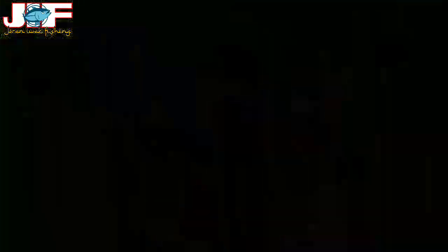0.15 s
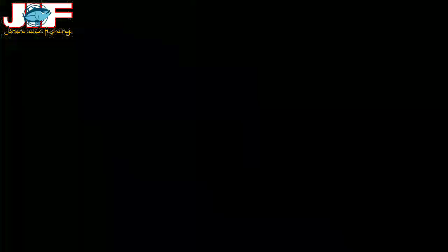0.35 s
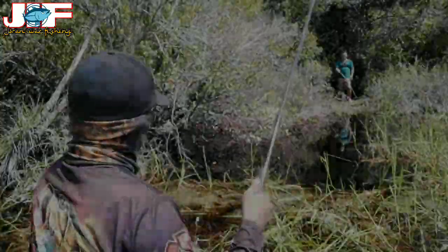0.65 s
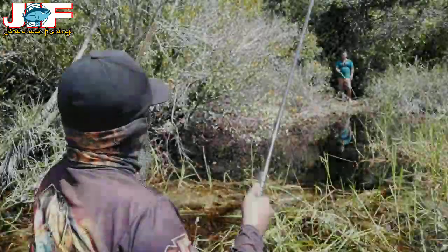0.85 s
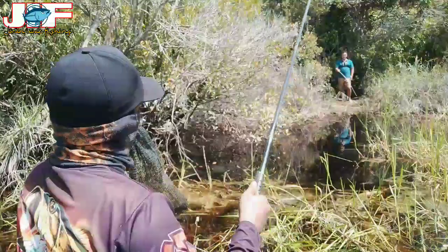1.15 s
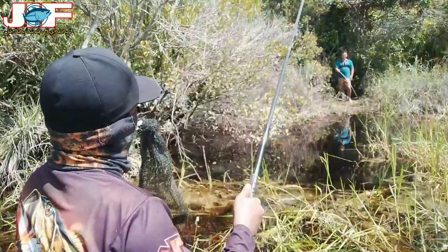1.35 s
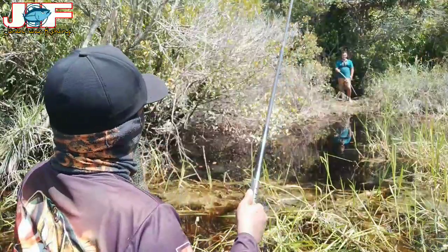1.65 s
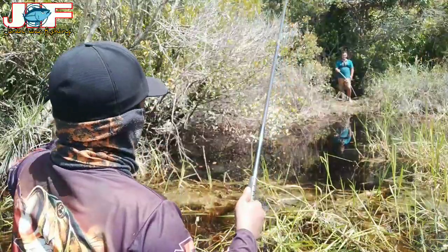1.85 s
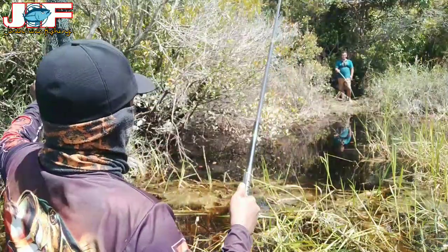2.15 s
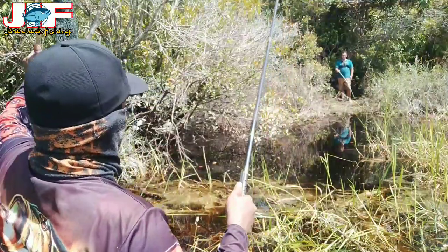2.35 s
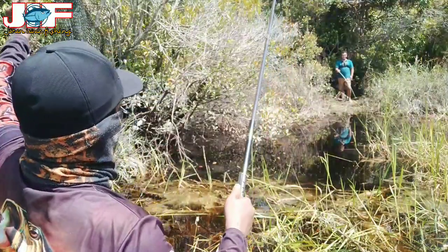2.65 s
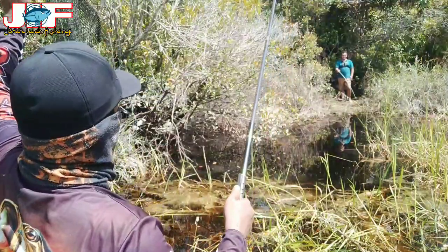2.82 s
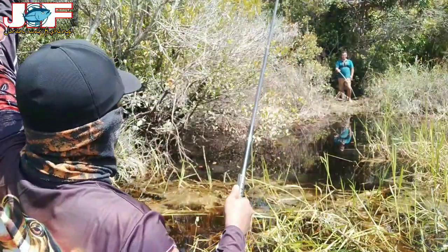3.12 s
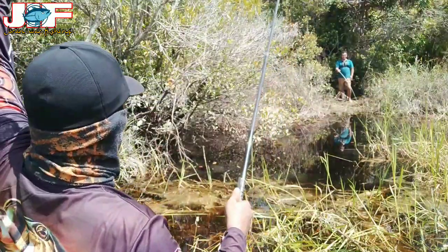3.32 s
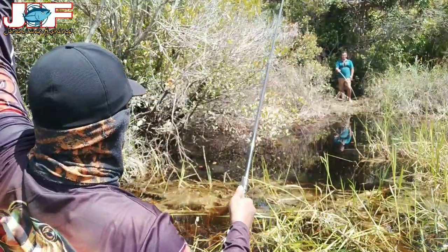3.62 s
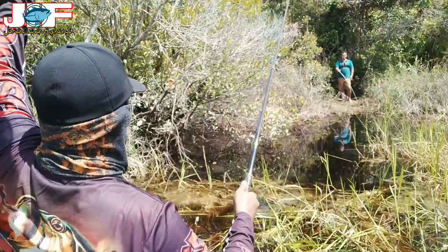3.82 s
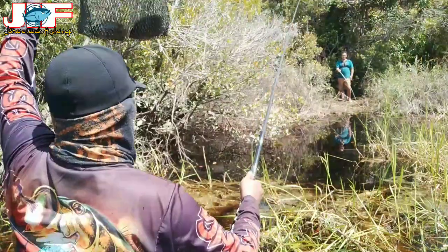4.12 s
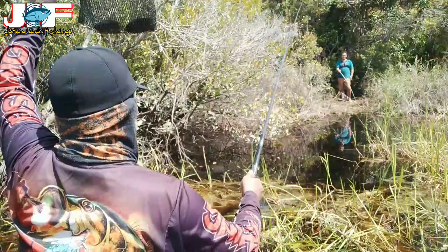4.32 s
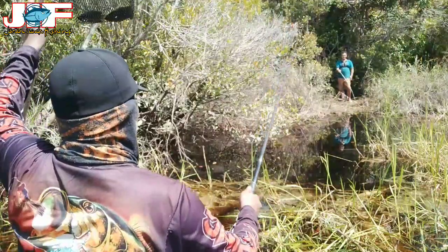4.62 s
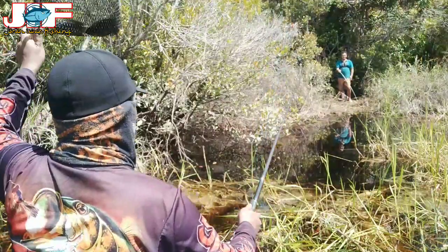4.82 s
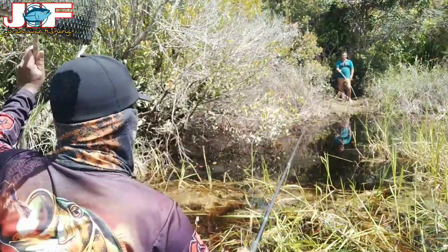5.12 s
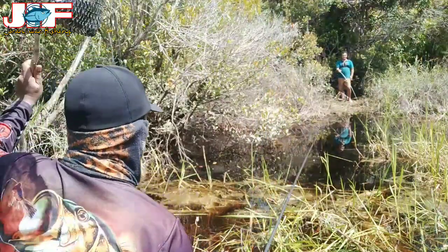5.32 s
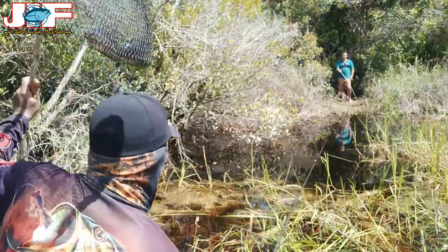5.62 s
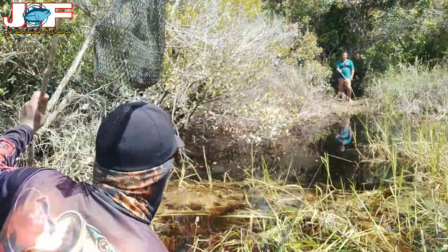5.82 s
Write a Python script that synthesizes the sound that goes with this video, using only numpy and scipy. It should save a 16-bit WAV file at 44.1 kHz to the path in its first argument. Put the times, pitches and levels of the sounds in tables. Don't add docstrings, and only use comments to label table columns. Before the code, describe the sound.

A brief burst of dripping, rustling net fades into silence, then an open swamp fades up. One bird repeats four quick chips while a hoarser one alternates falling and rising phrases. A wooden knock rings through the trees near two seconds; a trilling insect swells and stops abruptly at four and a half over throbbing katydids. Wind puffs hit the left side of the stereo microphone, and twigs snap close by at the end.

```python
import sys
import numpy as np
from scipy import signal
from scipy.fft import rfft, irfft
from scipy.io import wavfile

SR = 44100
rng = np.random.default_rng(int(sys.argv[2]) if len(sys.argv) > 2 else 0)


def level_to_linear(level):
    exponent = np.asarray(level, float) / 20
    return 10 ** exponent


def to_wav(sig):
    pcm = np.clip(np.atleast_2d(sig), -1, 1) * 32767
    pcm = np.round(pcm).astype(np.int16)
    wavfile.write(sys.argv[1], SR, pcm.T)


N = 263277


def rms_one(x):
    return x / np.sqrt(np.mean(x ** 2) + 1e-20)


def in_time(rows):
    s, *columns = np.transpose(rows)
    return [np.interp(np.arange(N) / SR, s, c) for c in columns]


def at_hz(points, hz):
    table_hz, value = np.transpose(points)
    return np.interp(np.log(hz), np.log(table_hz), value)


def drift(rate):
    r = np.exp(-80 * np.pi * rate / SR)
    slow = signal.lfilter([1], [1, -2 * r, r * r], rng.standard_normal(N // 40 + 2002))
    slow = slow[2000:]
    return np.interp(np.arange(N) / 40, np.arange(len(slow)), rms_one(slow))


def band(x, low_hz, high_hz):
    edges = [low_hz, min(high_hz, .46 * SR)]
    return signal.sosfilt(signal.butter(2, edges, "band", fs=SR, output="sos"), x)


def colour(x, points):
    hz = np.maximum(np.fft.rfftfreq(N, 1 / SR), 1)
    return irfft(rfft(x) * level_to_linear(at_hz(points, hz)), N)


def pan(x, db):
    return np.array([x * level_to_linear(db / 2), x * level_to_linear(-db / 2)])


def far_pan(x, db, late=12):
    left, right = pan(x, db)
    return np.array([left, np.roll(right, late)])


def add(out, s, x):
    i = round(s * SR)
    out[..., i:i + x.shape[-1]] += x[..., :max(N - i, 0)]


def note(rows):
    s, hz, db = np.transpose(rows)
    t = np.arange(s[0], s[-1], 1 / SR)
    phase = 2 * np.pi * np.cumsum(np.interp(t, s, hz)) / SR
    return level_to_linear(np.interp(t, s, db)) * np.sin(phase)


def swell(s, db, length):
    return level_to_linear(db - 20 * np.abs(np.arange(N) / SR - s) / length)


# (frequency [Hz], t60 [s])
TREE_T60 = [(150, 1.15), (500, 1.9), (1500, 1.14), (5000, 1.01), (12000, 0.11)]


def trees(x, length):
    t, edges = np.arange(SR) / SR, np.geomspace(100, 16000, 9)
    white = rng.standard_normal((2, SR))
    tail = 0
    for low_hz, high_hz in zip(edges, edges[1:]):
        t60 = length * at_hz(TREE_T60, low_hz)
        tail = tail + band(white, low_hz, high_hz) * level_to_linear(-60 * t / t60)
    return signal.fftconvolve(x[None], rms_one(tail) / np.sqrt(SR), axes=1)[:, :N]


# (frequency [Hz], level [dB per
# Hz])
FOREST_COLOUR = [(120, -10), (160, -4), (250, -4), (600, -8.5), (1500, -11), (3000, -11.5), (5000, -11.5),
                 (5900, -15.5), (7000, -9.5), (8500, -18), (9600, -21.5), (10300, -32), (15000, -22),
                 (15500, -74)]
# (frequency [Hz], correlation [-1..1])
EAR_LIKENESS = [(60, 0.78), (180, 0.38), (550, 0.19), (1650, -0.068), (4970, 0.07), (15000, 0.098)]
# (frequency [Hz], left minus right [dB])
FOREST_LEAN = [(60, 2), (130, -2), (290, -1), (640, -0.5), (1410, 0), (3100, -3), (6820, 0), (15000, 0.5)]


def forest(patchy_db):
    hz = np.maximum(np.fft.rfftfreq(N, 1 / SR), 1)
    alike = np.clip(at_hz(EAR_LIKENESS, hz), -1, 1)
    mid, side = rfft(rng.standard_normal((2, N)))
    both = pan(np.sqrt(1 + alike) * mid, 0) + np.sqrt(1 - alike) * side * [[1], [-1]]
    both = both * pan(level_to_linear(at_hz(FOREST_COLOUR, hz)), at_hz(FOREST_LEAN, hz)) * (hz > 110)
    out, places = 0, np.log2(hz / 100) * 2
    for k in range(0, 16, 2):
        share = np.clip(1 - np.abs(places - k) / 2, 0, 1)
        out = out + irfft(both * share, N) * level_to_linear(patchy_db * drift(19.0))
    return level_to_linear(-52.5) * rms_one(out)


# (time [s], level [dB])
BREEZE_LEVEL = [(0, -66), (.55, -54), (1.2, -56), (1.9, -53), (2.1, -64), (2.5, -70), (2.8, -60),
                (3.0, -65), (4.0, -60), (4.6, -60.5), (5.0, -56), (5.25, -63), (5.4, -56), (5.97, -58)]
# (time [s], level [dB], time to gain or lose 20 dB [s], left minus right [dB])
PORT_GUSTS = [(2.27, -54, 0.2, -4), (2.72, -50, 0.22, 10), (3.12, -48.5, 0.12, 17.5),
              (3.27, -50.5, 0.05, 15), (3.37, -54, 0.2, -12), (3.51, -51, 0.07, -10),
              (3.67, -49, 0.0734, 22.5), (3.9, -50, 0.04, 8), (4.21, -57, .3, 5), (4.34, -43, 0.12, 6),
              (4.42, -50, 0.0117, 15.5), (4.801, -57, 0.3, 8), (5.4, -47, 0.15, 3), (5.97, -54, 0.32, 4)]
# (time [s], level [dB])
PORT_PUFFS = [
    (3.089, -37),
    (3.29, -38.5),
    (3.569, -36.5),
    (3.794, -23.5),
    (4.405, -31.5),
    (5.345, -46),
]


def wind(gain):
    blowing = pan(level_to_linear(in_time(BREEZE_LEVEL)[0]), -1.5)
    for s, db, length, lean_db in PORT_GUSTS:
        blowing = blowing + pan(swell(s, db - 2.5, length), lean_db)
    noise = band(band(rng.standard_normal((2, N)), 40.0, 97.0), 40, 207)
    lumps = level_to_linear([6.3 * drift(9.6), 1.5 * drift(4.5)])
    out = rms_one(noise * lumps) * blowing * gain * level_to_linear(3.5)
    t = np.arange(0, .07, 1 / SR)
    push = np.exp(-t / 0.00726) * (1 - np.exp(-t / 0.00358))
    puff = np.sin(2 * np.pi * (115 * t - 500 * t ** 2)) * push
    for s, db in PORT_PUFFS:
        add(out, s - .004, pan(level_to_linear(db + 2.5) * puff, 25.2))
    return out


# (time [s], level [dB])
LOWER_CHORUS = [(0, -84), (.9, -58), (2.2, -76), (2.6, -97), (3.5, -69), (5.97, -67.5)]


def choruses():
    white = rng.standard_normal((3, N))
    wide = rms_one(band(band(white[0], 8570, 9760), 8130, 10130)) * level_to_linear(-66.5 + 1.14 * drift(6.1))
    lower = rms_one(band(white[1], 9130, 9330)) * level_to_linear(in_time(LOWER_CHORUS)[0] + 3.1 * drift(3.4))
    crickets = rms_one(band(white[2], 7610, 7933)) * level_to_linear(-71.5 + 1.0 * drift(12))
    return pan(wide + lower, 18.7) + pan(crickets, 20)


def stridulate(events, hz, width_hz, length, strokes):
    gate, t = np.zeros(N), np.arange(0, length, 1 / SR)
    for s, db in events:
        add(gate, s - .006, level_to_linear(db) * np.sin(np.pi * t / length) ** 0.46)
    clicks = (rng.random(N) < strokes / SR) * rng.normal(1, 0.88, N) * rng.choice([-1, 1], N)
    ring = band(clicks, hz - width_hz / 2, hz + width_hz / 2)
    return gate * rms_one(band(ring, hz - 2 * width_hz, hz + 2 * width_hz))


# (time [s], level [dB])
CRICKET_CHIRPS = [
    (1.85, -63),
    (2.3, -57),
    (4.36, -45.5),
    (4.53, -53),
    (4.8, -51),
    (5.045, -50),
    (5.23, -57),
    (5.43, -50),
]


def cricket():
    return pan(stridulate(CRICKET_CHIRPS, hz=7930, width_hz=320, length=0.026, strokes=430), 22) * level_to_linear(-7.5)


# (time [s], length [s], time between throbs [s], level [dB])
KATYDID_BOUTS = [
    (0.478, .88, 0.081, -49.5),
    (1.42, .65, 0.08, -55),
    (2.125, .07, 0.043, -49),
    (2.54, .5, 0.08, -67),
    (3.089, .96, .0712, -52.5),
    (4.074, .64, 0.0639, -48.5),
    (4.746, 1.2, .0733, -48),
]


def katydid(gain):
    throbs = []
    for start, length, period, db in KATYDID_BOUTS:
        for s in np.arange(start, min(start + length, N / SR), period):
            throbs.append((s, db + 20 * np.log10(gain[int(s * SR)] + 1e-6)))
    return pan(stridulate(throbs, hz=9510.0, width_hz=244, length=0.044, strokes=1100), 27.3) * level_to_linear(-16.5)


def blows(hits, modes, crack_top_hz):
    rings, cracks, t = np.zeros(N), np.zeros(N), np.arange(0, .2, 1 / SR)
    for s, db, bright_db in hits:
        ring = 0
        for (hz, level_db, t60), chance_db in zip(modes, rng.normal(0, 1.5, len(modes))):
            tilt_db = bright_db * np.log2(hz / 800)
            mode = np.sin(2 * np.pi * hz * t)
            ring = ring + level_to_linear(db - 5 + level_db + chance_db + tilt_db - 60 * t / t60) * mode
        add(rings, s, (1 - np.exp(-t / 0.00081)) * ring)
        snap = rng.standard_normal(len(t)) * level_to_linear(db - 8.0 - 60 * t / 0.067)
        snap[0] = 5.0 * level_to_linear(db)
        low = band(band(snap, 207, crack_top_hz), 192, 2540)
        middle = level_to_linear(2 * bright_db - 1.5) * band(band(snap, 1970, 3500), 750, 6400)
        high = level_to_linear(3.8 * bright_db - 4) * band(band(snap, 3950, 5400), 2330, 5700)
        add(cracks, s, low + middle + high)
    body = sum(level_to_linear(level_db) * band(cracks, hz - 55, hz + 55) for hz, level_db, t60 in modes)
    return rings, cracks, body


# (time [s], level [dB], brightness [dB per octave])
LOG_KNOCKS = [
    (2.052, -30.5, 2),
    (2.062, -18, 1),
    (2.077, -33, -2),
    (2.098, -32, 3.5),
    (2.116, -37, 0.5),
    (2.159, -40, -5),
]
# (frequency [Hz], level [dB], t60 [s])
LOG_MODES = [(237, -2.5, 0.03), (294, 1.5, 0.037), (400, -5, .025), (528, -6, 0.035), (783, -3, 0.04),
             (985, -4.5, 0.021), (1280, 1, 0.018), (1460, 2, 0.02), (1575, 2, 0.02), (2055, -2.5, 0.021),
             (2224, -1, 0.028), (2580, -10, .015), (2900, -7, 0.012)]
# (frequency [Hz], level [dB])
LOG_ECHO_COLOUR = [(150, -2), (400, 4), (800, -2), (1150, 0), (1700, -10), (2200, 3), (3700, -5), (4400, 4)]
# (time [s], level [dB], brightness [dB per octave])
STUMP_KNOCKS = [
    (4.475, -38, 1.5),
    (4.480, -28.5, -2),
    (4.490, -35, 0),
    (4.495, -28, -1.5),
    (4.505, -36, 1.5),
]
# (frequency [Hz], level [dB], t60 [s])
STUMP_MODES = [(216, -0.5, 0.027), (296, 4, .035), (358, -2.5, .03), (530, -4, .04), (779, -4, .035),
               (1064, 3, 0.033), (1290, -3, 0.025), (1850, -8.5, 0.022), (2080, -3, 0.023),
               (3030, -4, 0.017)]
# (frequency [Hz], level [dB])
STUMP_ECHO_COLOUR = [(150, -6), (300, 0), (550, 3), (850, -2), (1150, 2), (1700, -5), (2100, 1), (3000, 2)]


def knocks():
    direct, sent = 0, 0
    for hits, modes, crack_top_hz, echo_colour in (
            (LOG_KNOCKS, LOG_MODES, 1500, LOG_ECHO_COLOUR), (STUMP_KNOCKS, STUMP_MODES, 1150, STUMP_ECHO_COLOUR)):
        rings, cracks, body = blows(hits, modes, crack_top_hz)
        direct = direct + rings + level_to_linear(-3.0) * cracks
        sent = sent + colour(.9 * cracks + .8 * body + 0.035 * rings, echo_colour)
    tail, spread = trees(sent, length=0.42)
    returned = level_to_linear(10.2) * far_pan(tail, -1.9, late=4) + level_to_linear(-8) * spread * [[1], [-1]]
    return far_pan(direct, -0.76, late=4) + returned


# (time [s], level [dB], time to gain or lose 20 dB [s])
RUSTLES = [
    (.06, -47.5, 0.1266),
    (1.02, -63.5, 0.06),
    (1.3, -63.5, 0.08),
    (5.5, -50.5, 0.17),
    (5.42, -51, .06),
    (5.87, -53, 0.08),
    (5.97, -48, .08),
    (.6, -83, 1.5),
]


def rustle():
    grains = rng.random((2, N)) < 600 / SR
    grains = grains * level_to_linear(2.8 * np.minimum(rng.exponential(1, (2, N)), 4))
    grains = grains * rng.choice([-1, 1], (2, N))
    strength = sum(swell(*row) for row in RUSTLES)
    return strength * rms_one(band(grains + 0.25 * grains[::-1], 300, 5100))


# (time [s], level [dB])
BUZZ_LEVEL = [(0, -56), (.2, -68), (.33, -80), (.385, -92)]


def buzz():
    turn = 2 * np.pi * 122 * np.arange(N) / SR
    tone = np.sin(turn) + .5 * np.sin(2 * turn) + .2 * np.sin(3 * turn)
    return level_to_linear(in_time(BUZZ_LEVEL)[0] + 1.5) * tone


# (time [s], level [dB], pitch [Hz], t60 [s], pitch rise [share per s])
NET_DRIPS = [(.001, -28.5, 1510, 0.028, 5), (.017, -37, 2900, .015, 8), (.033, -35.5, 1004, .03, 6),
             (.037, -31.5, 2380, 0.022, 11), (.057, -36, 900, .025, 10), (.07, -35.5, 406, 0.052, 22),
             (.071, -36, 1450, .025, 6), (.086, -36, 2160, 0.027, 10), (.087, -38, 1240, 0.027, 6),
             (.1, -38, 2700, 0.017, 8), (.103, -41.5, 688, 0.055, 3), (.106, -45, 430, .07, -4),
             (.109, -38, 1105, .03, 8), (.116, -36.5, 1740, .02, 9), (.135, -45, 940, .09, 14),
             (.162, -44, 470, .1, 5), (.178, -47, 1700, 0.033, 11), (.195, -38, 1600, 0.027, 6),
             (.195, -46.5, 803, 0.082, 3), (.208, -47, 1080, .05, 2), (.228, -50, 1450, 0.037, 2),
             (.262, -58, 950, 0.065, 5), (.268, -59, 600, .03, 2), (.329, -56, 1130, .04, 24),
             (.372, -69, 690, .05, 32), (.517, -49.5, 1850, .026, 12), (.529, -54, 1560, .03, 10),
             (4.975, -39, 660, .03, -4), (5.716, -32, 1500, .025, 0)]
# (time [s], level [dB], pitch [Hz])
STEM_POPS = [
    (.0705, -37, 220),
    (4.1232, -26.5, 1700),
    (4.1232, -28, 1100),
    (4.1232, -31, 500),
    (4.1285, -35, 1200),
    (5.494, -36, 1600),
    (5.644, -33, 1000),
    (5.72, -34, 800),
]


def drips():
    out, t = np.zeros((2, N)), np.arange(0, .15, 1 / SR)
    spray = [(.27 * a, -41 - 22 * a - 6 * b, 450 * 4.5 ** c, .02, 6.0)
             for a, b, c in rng.random((150, 3))]
    pops = [(*pop, .006, 0) for pop in STEM_POPS]
    for s, db, hz, t60, rise in [*NET_DRIPS, *pops, *spray]:
        attack = 1 - np.exp(-t / min(.0015, t60 / 15))
        drip = np.sin(2 * np.pi * hz * (t + rise * t ** 2 / 2)) * attack
        add(out, s, pan(level_to_linear(db - 60 * t / t60) * drip, -1.2))
    return out


# (time [s], level [dB], frequency [Hz], t60 [s], left minus right [dB])
TWIG_SNAPS = [(.196, -43, 3970, 0.045, -15), (.994, -43, 9000, .039, 11), (1.0695, -43, 5970, 0.102, -9),
              (3.0855, -42, 9000, .02, 3), (3.75, -45.5, 12000, .013, -8), (4.1225, -21, 6200, .011, 3),
              (4.1275, -34, 8000, .012, 5), (4.357, -36, 8960, .0067, 14), (5.3328, -30, 6750, .015, 0),
              (5.432, -33, 4850, 0.0126, -3), (5.492, -28, 5040, .0087, -3), (5.532, -42, 1800, .012, 0),
              (5.6443, -23, 5050, 0.011, -5), (5.7154, -29, 4400, 0.057, -9),
              (5.7715, -25, 6500, 0.035, -7), (5.865, -43.5, 5960, .015, -32.5),
              (5.946, -36, 9000, .012, -8), (5.957, -36, 5700, 0.03, -13)]
# (time [s], level [dB])
NET_SNAPS = [
    (.065, -31),
    (.119, -31),
    (.277, -56),
    (.326, -62.5),
    (3.977, -39),
    (4.9744, -33),
    (5.402, -39),
    (5.416, -39),
    (5.473, -28.5),
]


def snaps():
    out, t = np.zeros((2, N)), np.arange(0, .15, 1 / SR)
    mesh = [(s, db, 4750, 0.014, -15) for s, db in NET_SNAPS]
    for s, db, hz, t60, lean_db in sorted([*TWIG_SNAPS, *mesh]):
        burst = rng.standard_normal((2, len(t))) * level_to_linear(db - 5.5 - 60 * t / t60)
        burst[:, 0] = 2.0 * level_to_linear(db)
        burst[1] = .7 * burst[0] + .5 * burst[1]
        snap = 0.99 * band(burst, hz / 1.56, hz * 1.24) + 0.6 * band(burst, 440, 9300)
        add(out, s, snap * level_to_linear([[lean_db / 2], [-lean_db / 2]]))
    return out


# (time [s], level [dB])
FIBRE_TICKS = [(0.0638, -48), (0.1176, -49), (0.9936, -52), (1.0675, -52), (3.0869, -56), (3.7439, -49),
               (4.121, -35), (4.357, -51), (5.3313, -44), (5.4715, -50), (5.7703, -45), (5.9454, -50)]


def ticks():
    out, t = np.zeros((2, N)), np.arange(0, .03, 1 / SR)
    for s, db in FIBRE_TICKS:
        bright = band(rng.standard_normal((2, len(t))), 9500, 16400)
        add(out, s, bright * level_to_linear(db + 4.5 - 60 * t / .012))
    return out


# (time [s], pitch [Hz], level [dB])
FAR_WHISTLES = [
    [(2.49, 3300, -74), (2.52, 3400, -65), (2.56, 3650, -62), (2.58, 3820, -64), (2.6, 4000, -62),
     (2.62, 4030, -80)],
    [(4.825, 1510, -64), (4.855, 1520, -54), (4.885, 1520, -63), (4.93, 1530, -53), (4.95, 1530, -75)],
    [(5.04, 1550, -66), (5.1, 1560, -56), (5.22, 1560, -56), (5.29, 1550, -72)],
]
# (time [s], pitch [Hz], level [dB])
DOVE_HOOTS = [
    [(3.66, 328, -73), (3.7, 335.4, -53), (3.77, 323, -62)],
    [(3.94, 320, -65), (4.02, 327.5, -52), (4.12, 315.5, -78)],
    [(4.68, 341, -57), (4.73, 338, -50.5), (4.8, 320, -102)],
]


def far_callers():
    far = np.zeros(N)
    for rows in [*FAR_WHISTLES, *DOVE_HOOTS]:
        add(far, rows[0][0], note(rows))
    return far_pan(far * level_to_linear(2.5 * drift(30)), -3.0, late=3)


# (time [s], level [dB])
CHIP_PHRASES = [
    (0.38, 2),
    (1.044, 0),
    (1.771, 0),
    (2.497, 0),
    (3.158, -1),
    (3.823, -2),
    (4.495, -10),
    (5.163, -2),
    (5.832, -4),
]
# (time after phrase start [s], level [dB])
PHRASE_CHIPS = [
    (0, -51.5),
    (.057, -49.5),
    (0.141, -49),
    (.193, -50),
]
# (time [s], pitch [Hz], level [dB])
CHIP_GLIDE = [(0, 2560, 8), (.005, 2450, 18), (.009, 2350, 15), (.012, 2050, 9), (.016, 1750, 6),
              (.023, 1570, -5)]


def chip_bird():
    chips = np.zeros(N)
    for start, phrase_db in CHIP_PHRASES:
        for after, chip_db in PHRASE_CHIPS:
            db = chip_db + phrase_db
            add(chips, start + after - .003, level_to_linear(db) * note(CHIP_GLIDE))
            add(chips, start + after + 0.024, level_to_linear(db - 8) * note(CHIP_GLIDE[:3]))
    scatter = trees(band(chips, 2200, 2700), length=0.14)
    return far_pan(chips, -5.0, late=9) * level_to_linear(-8.5) + level_to_linear(-17) * scatter


# (time [s], pitch [Hz], level [dB])
FALL_GLIDE = [(0, 5500, -12), (.01, 5250, -3), (.02, 4800, -1), (.032, 4350, -2), (.044, 4050, -6),
              (.054, 3950, -13), (.062, 3900, -26)]
# (time [s], pitch [Hz], level [dB])
RISE_GLIDE = [(0, 4136, -11), (.012, 4500, 2), (.03, 4910, 2.5), (.055, 5226, -5.5), (.07, 4750, 6),
              (.09, 5076, -14.5), (.11, 4750, -4), (.13, 4900, -22)]
# (time [s], level [dB])
FALLS_SUNG = [
    (.855, -55),
    (1.537, -51),
    (2.682, -44.5),
    (3.853, -38.5),
    (4.985, -39),
]
# (time [s], level [dB])
RISES_SUNG = [
    (2.16, -44),
    (3.255, -45),
    (4.395, -41),
    (5.545, -46.5),
]
# (delay [s], level [dB])
SONG_ECHOES = [
    (.033, -0.5),
    (.052, -3.5),
    (.075, -6),
]


def singer():
    song = np.zeros(N)
    for glide, sung in ((FALL_GLIDE, FALLS_SUNG), (RISE_GLIDE, RISES_SUNG)):
        for s, db in sung:
            add(song, s, level_to_linear(db) * note(glide))
    echoes = sum(level_to_linear(db) * np.roll(song, round(s * SR)) for s, db in SONG_ECHOES)
    leaves = rms_one(band(rng.standard_normal(N), 23, 300))
    echoes = band(echoes * leaves, 4100, 5600)
    song = song * (1 + .3 * rms_one(band(rng.standard_normal(N), 50, 250)))
    return song, echoes


def birds():
    song, echoes = singer()
    others = far_callers() + chip_bird()
    scatter = trees(band(band(song, 4350, 5600), 4200, 6000), length=0.5) * level_to_linear([[-6], [2.5]])
    return others + far_pan(song, -19.5) * level_to_linear(-14) + scatter + far_pan(echoes, -11.0) * level_to_linear(-8.5)


# (time [s], rate [pulses per s])
PULSE_RATE = [(2.7, 133.6), (3.2, 134.0), (3.29, 138.3), (3.44, 135.3), (3.75, 135.9), (4.2, 135.6),
              (4.5, 137.0)]
# (multiple of pulse rate, level [dB])
PULSE_LINES = [(24, -17), (25, -0.5), (26, 0), (27, -4.5), (28, -12)]
TRILL_START_S, TRILL_SWELL_S, TRILL_STOP_S, TRILL_RELEASE_S = 2.69, 0.93, 4.54, 0.028
TRILL_START_DB, TRILL_FULL_DB, TRILL_AFTER_DB = -62.5, -45.5, -67


def trill(gain):
    phase = 2 * np.pi * np.cumsum(in_time(PULSE_RATE)[0] * (1 + 0.00099 * drift(20.0))) / SR
    lines = 0
    for k, line_db in PULSE_LINES:
        lines = lines + level_to_linear(line_db + 0.89 * drift(9.0)) * np.sin(k * phase + 1.18 * drift(29.3))
    stop = TRILL_STOP_S + TRILL_RELEASE_S
    db, = in_time([(TRILL_START_S - .03, -95), (TRILL_START_S, TRILL_START_DB),
                   (TRILL_START_S + TRILL_SWELL_S, TRILL_FULL_DB), (TRILL_STOP_S, TRILL_FULL_DB),
                   (stop, TRILL_AFTER_DB), (stop + 0.056, TRILL_AFTER_DB), (stop + .12, -110)])
    dry = gain * level_to_linear(db) * rms_one(lines)
    scatter = trees(dry, length=0.073) * level_to_linear([[-2.5], [2.5]])
    return far_pan(dry, -3.5) * level_to_linear(-4.0) + level_to_linear(-6.0) * scatter


FADE_OUT_S, FADE_OUT_DB, FADE_OUT_BEND = 0.39, -1.5, 1.63
FADE_IN_AT_S, FADE_IN_S, FADE_IN_BEND = 0.42, 1.37, 0.53
REST_DB = -6.5
# (time [s], rise [s], level over rest [dB], hold [s], sink [s])
GAIN_OPENINGS = [
    (0.937, 0.11, 7, 0.089, 0.3),
    (2.049, .005, 11, 0.22, 0.29),
    (2.598, 0.12, 7, .01, 0.34),
    (3.081, 0.0064, 10, 0.0088, 0.29),
    (3.188, 0.095, 10, 0.024, 0.97),
    (2.987, 0.79, 10.5, .4, .5),
    (3.593, 0.85, 12, 0.46, 0.52),
    (5.326, 0.00783, 10, .7, .3),
]


def recorder_gain():
    t = np.arange(N) / SR
    openings = [np.interp(t, np.cumsum([s, rise, hold, sink]), [0, db, db, 0])
                for s, rise, db, hold, sink in GAIN_OPENINGS]
    opened_db = np.max(openings, axis=0)
    fade_out = level_to_linear(FADE_OUT_DB) * np.clip(1 - t / FADE_OUT_S, 0, 1) ** FADE_OUT_BEND
    fade_in = np.clip((t - FADE_IN_AT_S) / FADE_IN_S, 0, 1) ** FADE_IN_BEND
    return fade_out + level_to_linear(REST_DB + opened_db) * fade_in


def scene():
    gain = recorder_gain()
    silent = np.clip(gain / level_to_linear(-54), 0, 1)
    background = gain * forest(patchy_db=1.53) + wind(gain)
    insects = trill(gain) + katydid(gain) + cricket() + gain * choruses()
    through_trees = gain * birds() + knocks()
    close_by = snaps() + drips() + rustle() + buzz() + ticks()
    return silent * (background + insects + through_trees + close_by)


def roll_off(x):
    return signal.sosfilt(signal.butter(12, 16510, fs=SR, output="sos"), x)


def record(dry):
    mix = signal.sosfilt(signal.butter(3, 46, "high", fs=SR, output="sos"), dry)
    return roll_off(mix)


dry = scene()
out = record(dry)
to_wav(out)
```